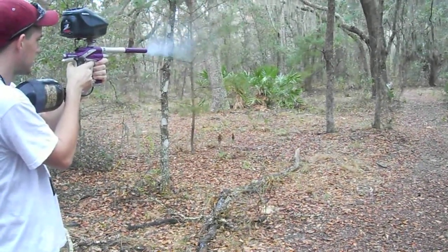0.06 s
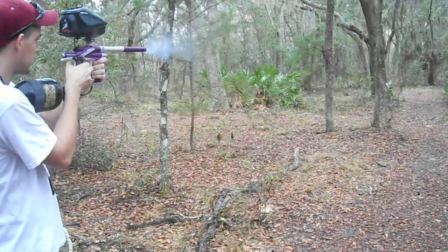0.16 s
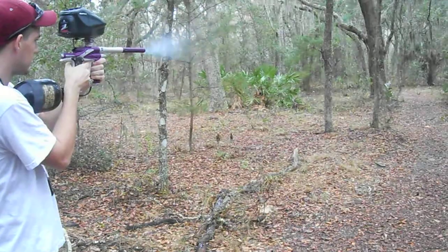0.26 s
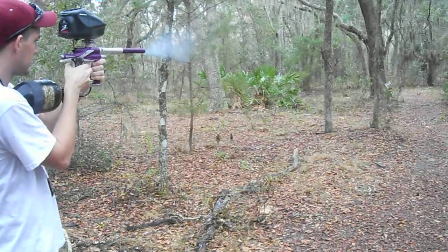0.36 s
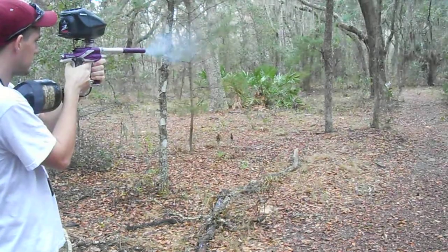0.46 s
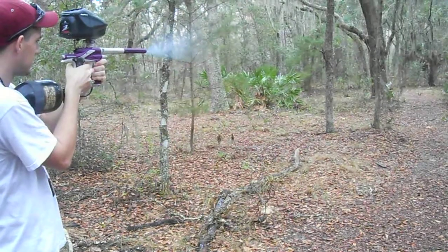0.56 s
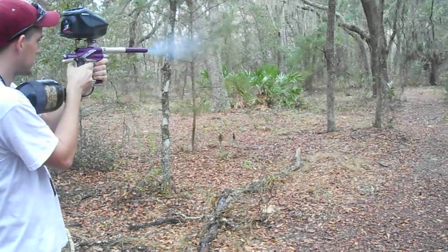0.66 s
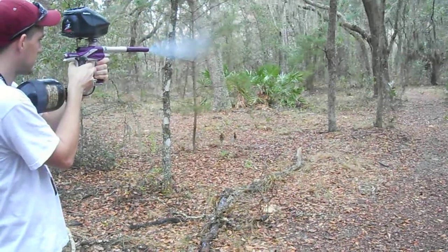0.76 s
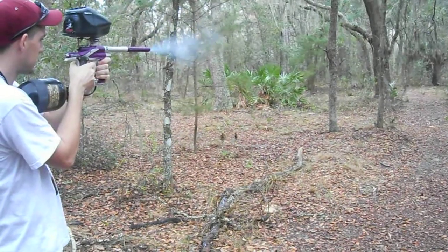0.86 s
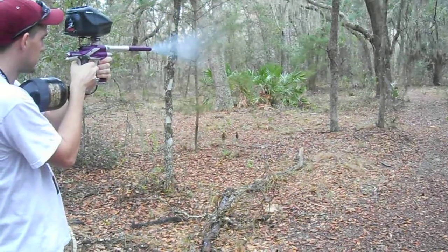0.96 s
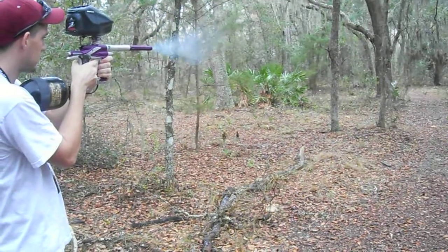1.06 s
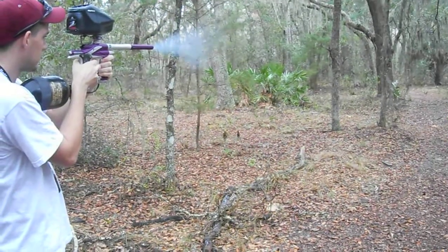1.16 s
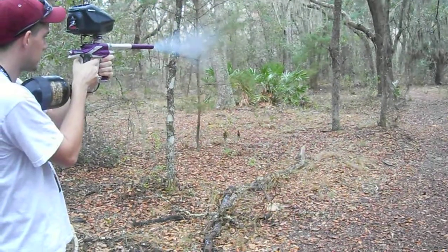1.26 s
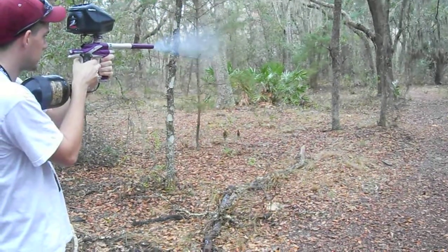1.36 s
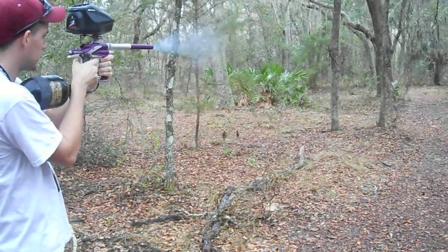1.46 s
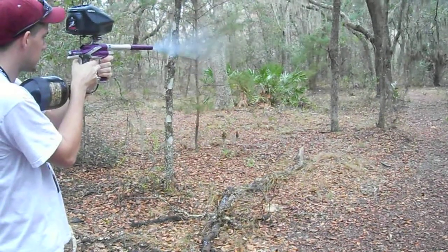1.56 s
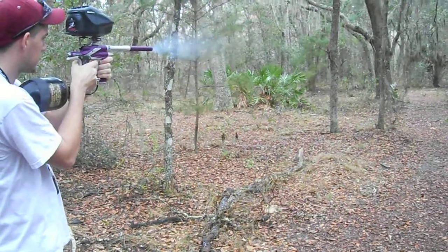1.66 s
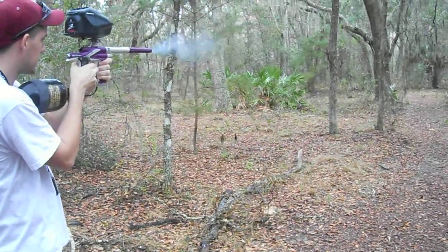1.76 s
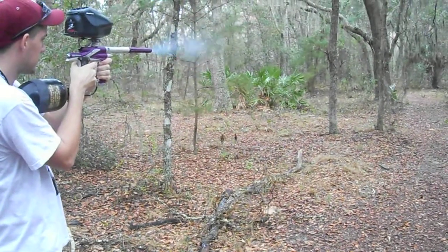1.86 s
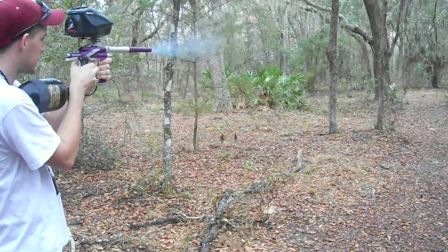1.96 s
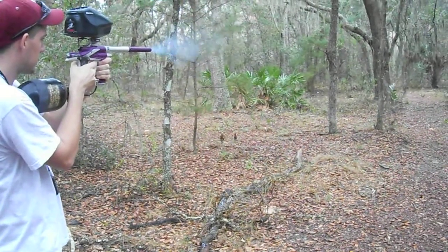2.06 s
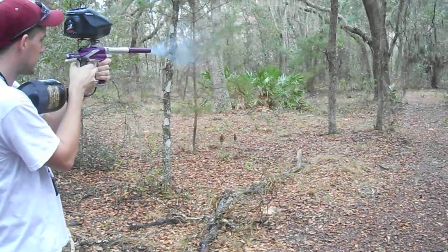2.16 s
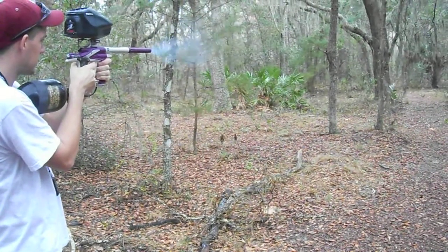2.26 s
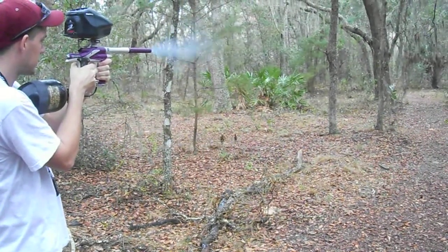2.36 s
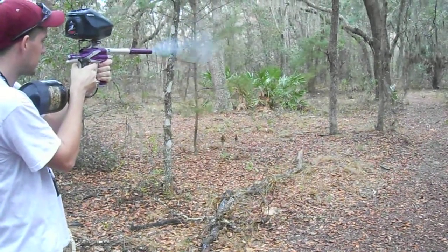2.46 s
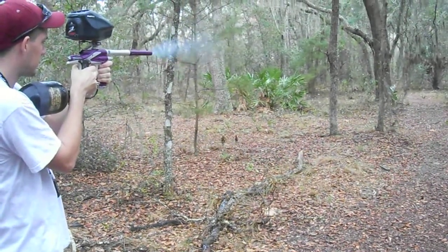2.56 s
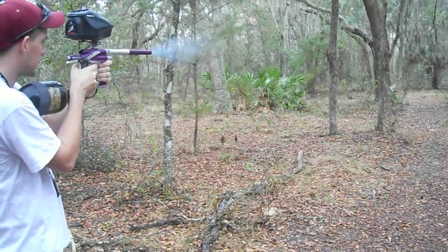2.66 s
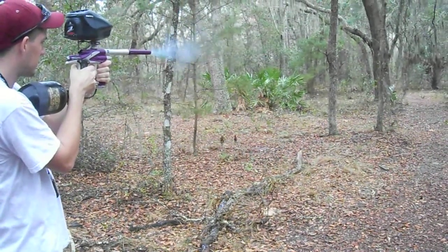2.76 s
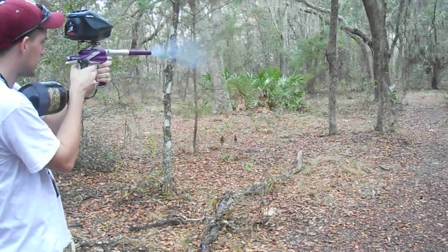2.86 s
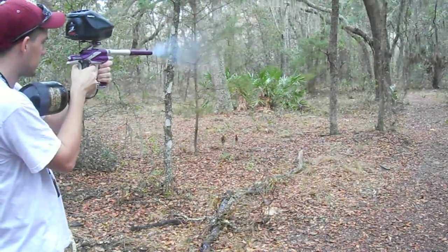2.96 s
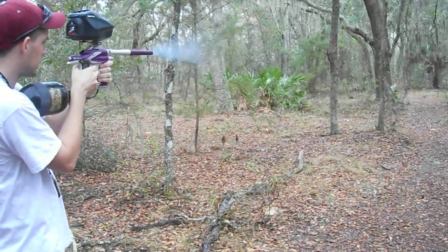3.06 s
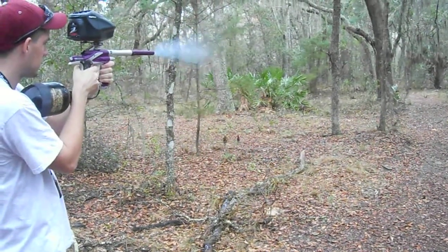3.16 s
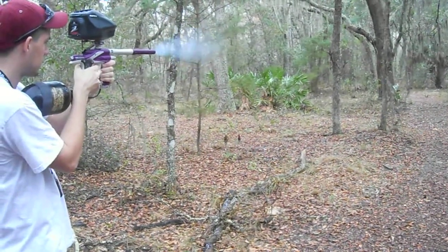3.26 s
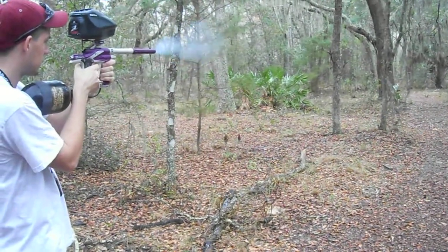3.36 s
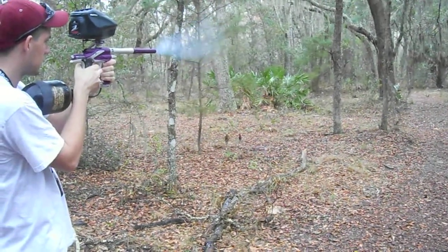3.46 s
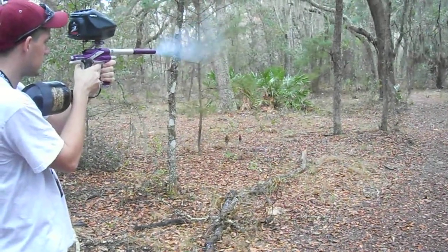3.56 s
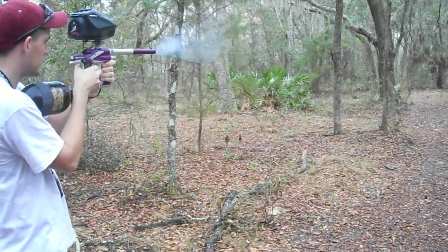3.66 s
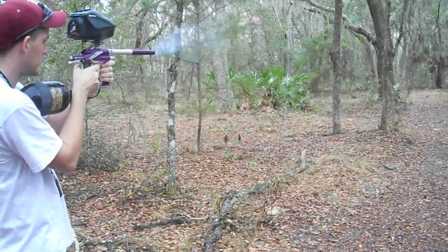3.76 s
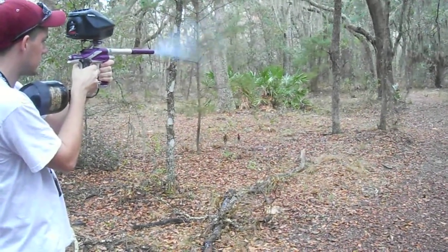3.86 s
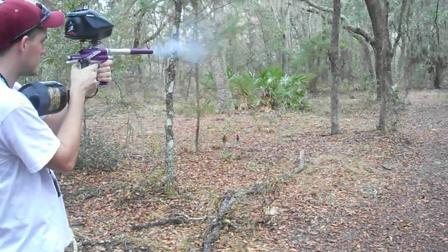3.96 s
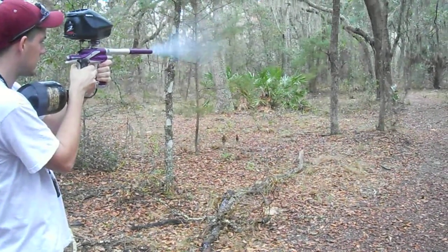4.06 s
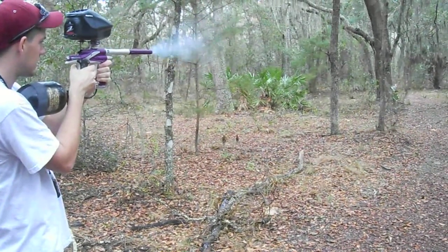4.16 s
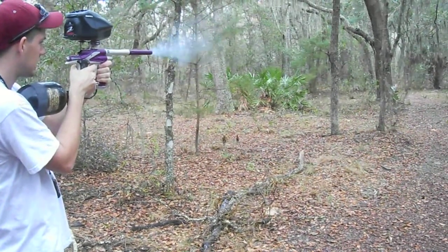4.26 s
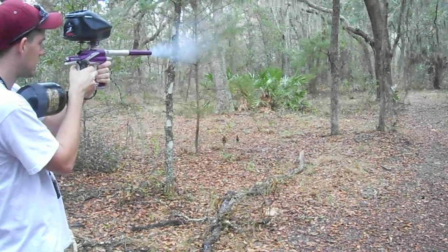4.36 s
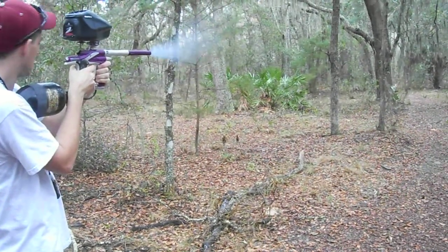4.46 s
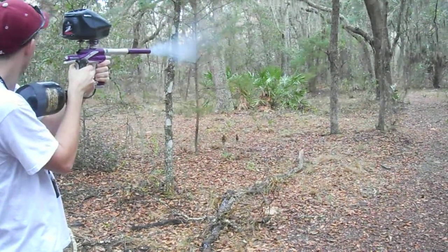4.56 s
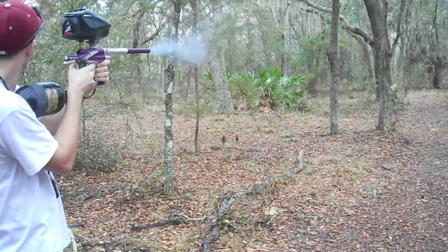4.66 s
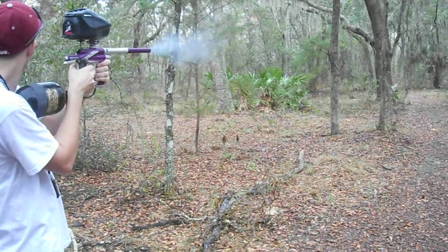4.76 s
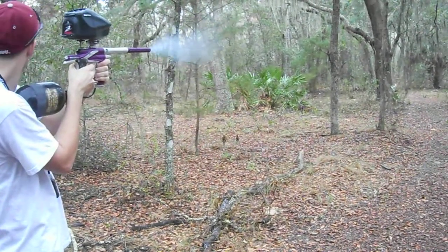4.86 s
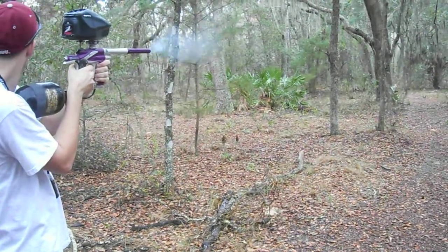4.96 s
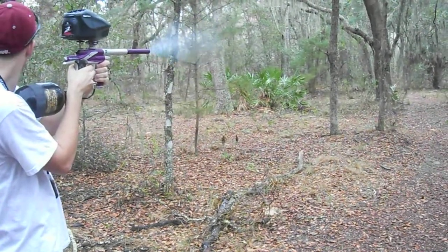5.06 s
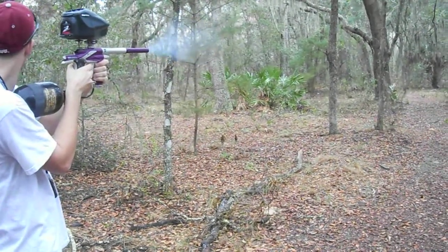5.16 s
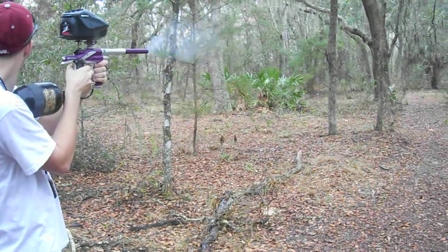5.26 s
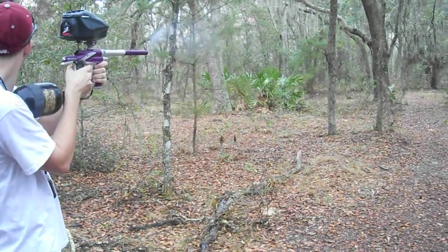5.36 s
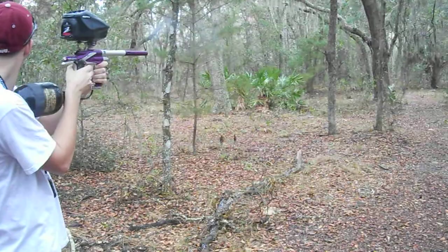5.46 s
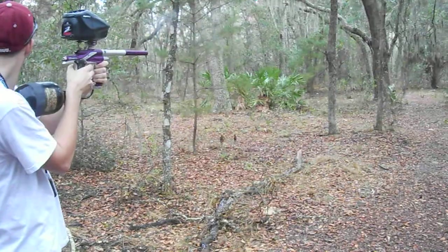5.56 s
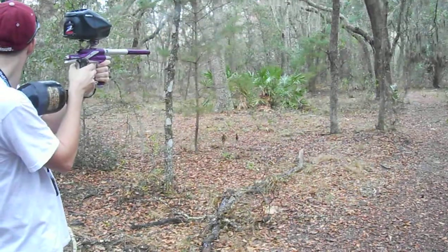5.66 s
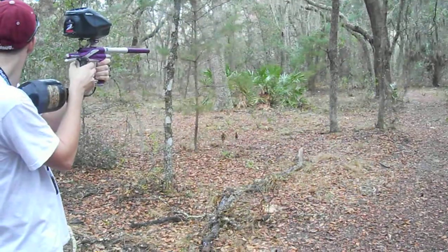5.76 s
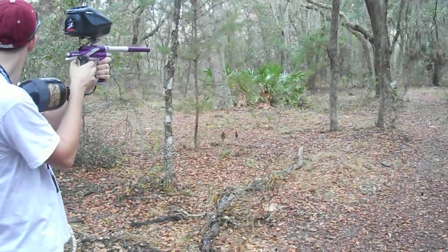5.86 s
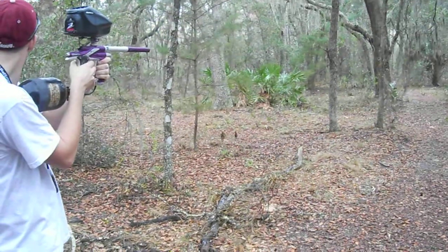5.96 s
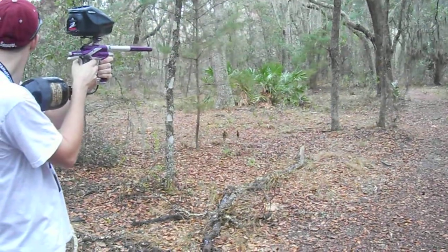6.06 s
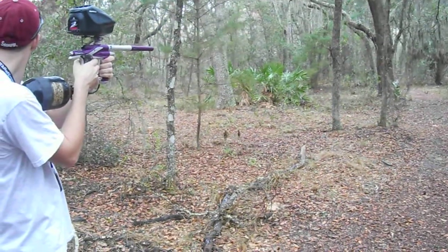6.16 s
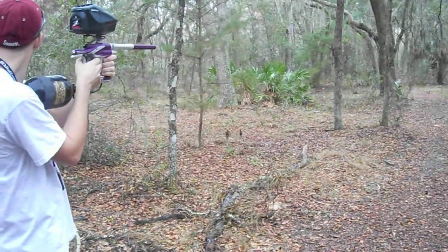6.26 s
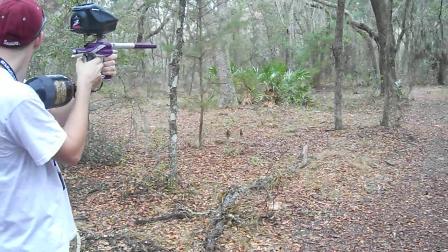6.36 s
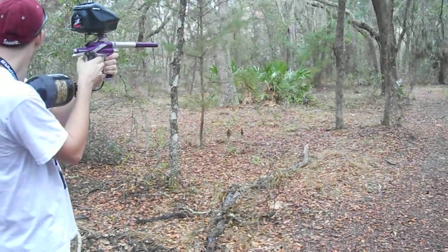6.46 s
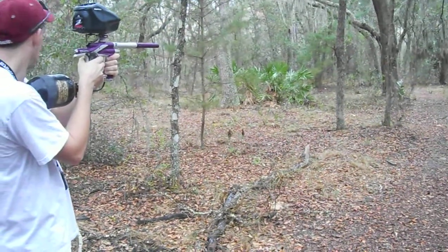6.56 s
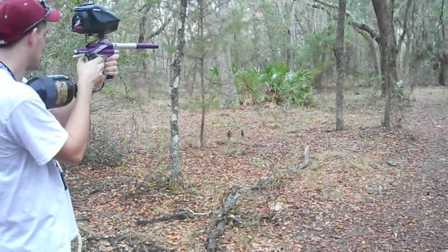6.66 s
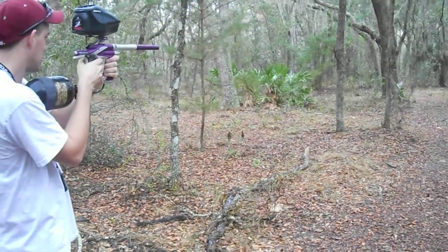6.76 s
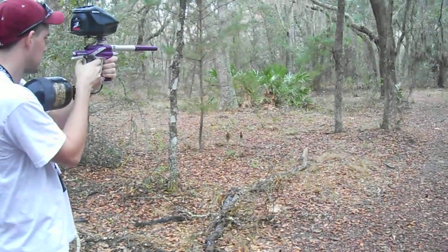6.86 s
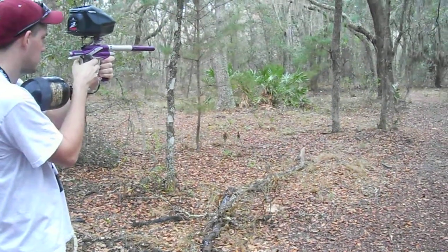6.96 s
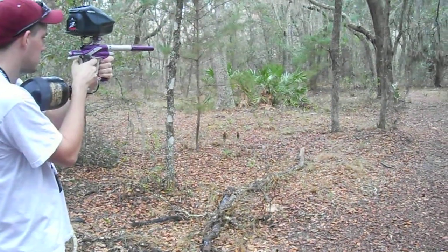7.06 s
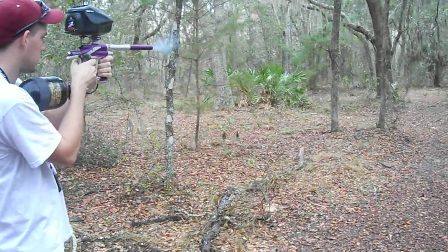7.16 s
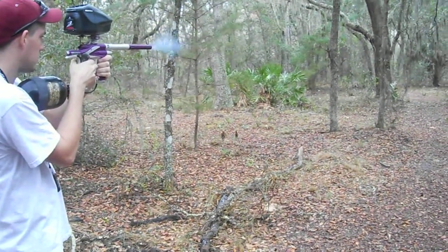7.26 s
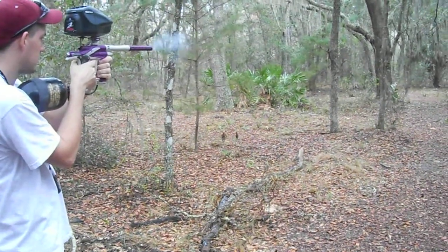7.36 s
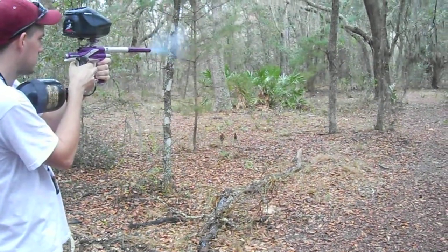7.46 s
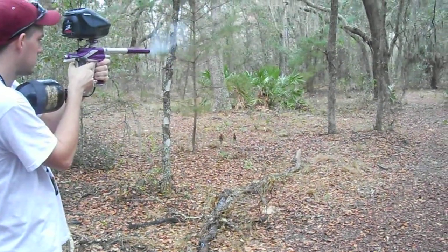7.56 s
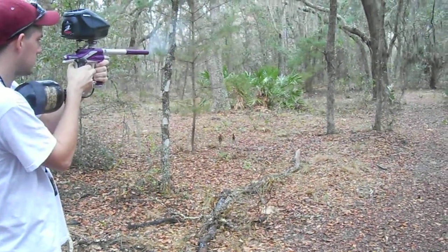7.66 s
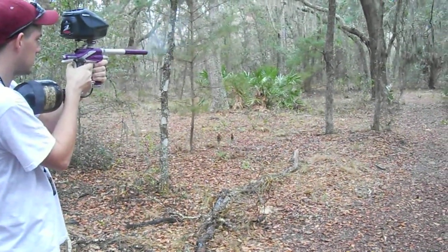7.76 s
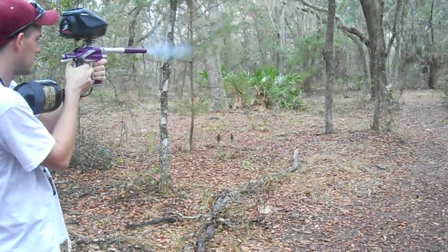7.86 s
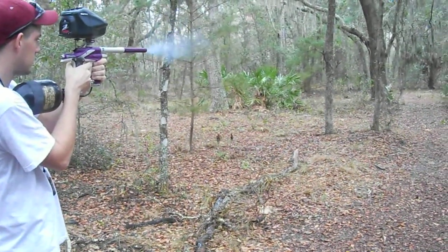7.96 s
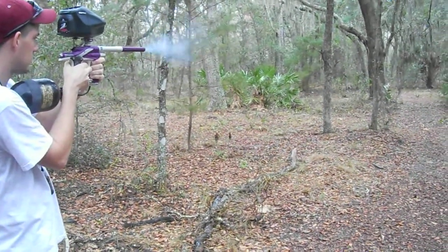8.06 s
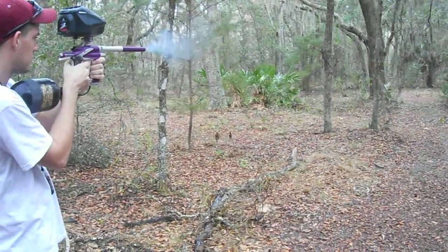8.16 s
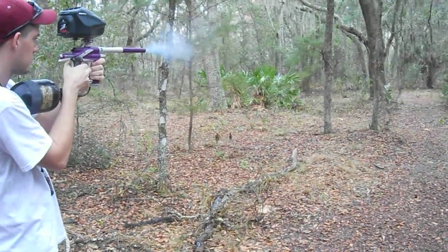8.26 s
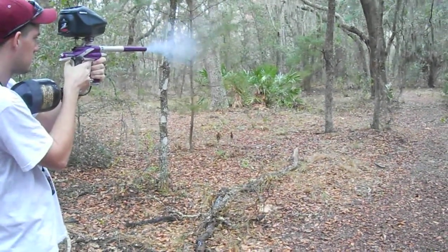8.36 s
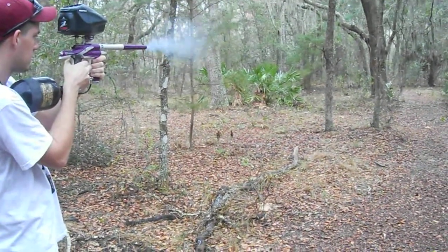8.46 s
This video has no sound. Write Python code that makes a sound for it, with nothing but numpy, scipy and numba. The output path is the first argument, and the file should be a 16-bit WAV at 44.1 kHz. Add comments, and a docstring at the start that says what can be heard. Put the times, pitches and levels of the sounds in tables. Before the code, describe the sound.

A compressed-air paintball gun fires close to the microphone at the edge of a wood, about twelve shots a second. Each shot is a hollow pop with a spit of gas, a click and a bolt clack, followed by a light echo from the trees. The firing runs from the start, with tiny breaks near 2.4, 3.7 and 4.9 seconds, and stops at about 5.2 seconds. Balls click against the plastic feeder in the gaps. Three faint, dull knocks on distant wood come between 5.6 and 6.2 seconds, while a soft outdoor hush slowly swells. At 7.1 seconds a loud, slightly overloaded shot breaks the lull, with two more single shots near 7.2 and 7.4 seconds. A last rapid string runs from 7.8 to about 8.5 seconds.

```python
"""Rapid strings of hollow pops, then a few single ones and a last string: a compressed-air paintball marker
close to the microphone, at the edge of a wood. Each shot is a sear click, a pop with jets of gas and the
clack of the returning bolt; the trees answer. Balls click in the feed neck and knock on wood far off.
The camera's gain control creeps up in the pause, lifting the outdoor hush, so the next shot overloads it."""
import sys
import numpy as np
from scipy import signal
from scipy.fft import rfft, irfft, next_fast_len
from scipy.io import wavfile
from scipy.ndimage import uniform_filter1d, minimum_filter1d
from numba import njit

SR = 44100
rng = np.random.default_rng(int(sys.argv[2]) if len(sys.argv) > 2 else 0)


def wav_record(signal):
    """Record a signal, one row per channel, as 16-bit PCM in the file named by sys.argv[1]."""
    frames = np.transpose(np.atleast_2d(signal))
    bounded = np.clip(frames, -1, 1)
    # unit amplitude maps onto the largest positive 16-bit level
    quanta = np.round(bounded * 32767).astype(np.int16)
    wavfile.write(sys.argv[1], SR, quanta)


N = 375732
LEAD = SR // 4  # samples of run-up before time zero
T = np.arange(SR // 10) / SR  # time within one small event [s]


def amp(db):
    """Decibels to gain."""
    return 10 ** (np.asarray(db) / 20)


def unit(x):
    """Scale to rms 1."""
    return x / np.sqrt(np.mean(x ** 2) + 1e-20)


def causal(points, size=4096):
    """The shortest causal impulse response through (frequency [Hz], level [dB]) points."""
    hz, db = np.transpose(points)
    spectrum_db = np.interp(np.log(np.fft.rfftfreq(size, 1 / SR) + 1), np.log(hz), db)
    cepstrum = irfft(np.log(amp(spectrum_db)))
    cepstrum[1:size // 2] *= 2
    cepstrum[size // 2 + 1:] = 0
    return irfft(np.exp(rfft(cepstrum)))


def through(x, response):
    """Convolve, keeping the length."""
    return signal.fftconvolve(x, response)[:len(x)]


def colour(x, points):
    """Shape the spectrum; white noise keeps its power."""
    response = causal(points)
    return through(x, response / np.linalg.norm(response))


def burst(t60):
    """A puff of noise that dies away."""
    return rng.standard_normal(len(T)) * amp(-60 * T / t60)


def ring(hz, t60):
    """One damped mode."""
    return np.sin(2 * np.pi * hz * T) * amp(-60 * T / t60)


def track(events):
    """Lay (time [s], level [dB], sound) events on the time line."""
    out = np.zeros(LEAD + N + SR)
    for s, db, sound in events:
        out[LEAD + round(s * SR):][:len(sound)] += amp(db) * sound
    return out[:LEAD + N]


# Trigger pulls beside the microphone: (first shot [s], last shot [s], usual bolt travel [s])
TRIGGER_PULLS = [(-.0399, 2.376, .0255), (2.5159, 3.6432, .0253), (3.7915, 4.8384, .0253),
                 (4.9843, 5.1451, .025), (7.0853, 7.0853, .0183), (7.2373, 7.2373, .0213),
                 (7.4368, 7.4368, .0213), (7.7618, 8.4862, .0224)]

def firing_times(cycle_s=.0805, head_start_s=.0028):
    """Times of shots and bolt returns; the rested bolt comes back sooner on a pull's first shot."""
    shots, returns = [], []
    for first, last, travel in TRIGGER_PULLS:
        string = np.linspace(first, last, round((last - first) / cycle_s) + 1)
        shots.extend(string)
        returns.extend(string + travel - head_start_s * (string == first))
    return np.array(shots), np.array(returns)


# The sear's click, close up: (frequency [Hz], relative level [dB])
SEAR_SPECTRUM = [(60, -6), (220, 1.5), (500, -9.5), (900, 11), (1600, -6.5), (3000, -9.5), (5500, -8.5),
                 (10000, -14)]

def sear(shots, db=-32.5, ahead_s=.0112):
    """The sear lets the hammer go just before each shot."""
    return colour(track((s - ahead_s, db, burst(t60=.044)) for s in shots), SEAR_SPECTRUM)


# Resonances of barrel and body, close up: (frequency [Hz], relative level [dB])
BARREL_MODES = [(92, -31), (148, -25), (250, -22.5), (348, -21.5), (440, -22), (578, -24.5), (708, -21),
                (815, -19.5), (918, -19), (1105, -27.5), (1208, -73), (1335, -28), (1440, -24), (1578, -21),
                (1812, -23), (1985, -29), (2405, -19), (2650, -41), (3410, -22), (3970, -22)]

def pop(flow_s=.012, quality=24, vary_db=1.42, detune=.0089, body_hz=1150):
    """The barrel sounds only while the gas flows, nearly alike on every shot; high modes fade first."""
    hz, db = np.transpose(BARREL_MODES)
    size, pitch = rng.standard_normal((2, len(hz)))
    # neighbouring air modes swing opposite ways and swell late; the body's start with the hammer
    signs = np.where(hz < body_hz, (-1) ** np.arange(len(hz)), 1)
    phase = 2 * np.pi * np.outer(hz * (1 + detune * pitch), T)
    modes = np.sin(phase) * np.exp(-phase / (2 * quality))
    flow = np.exp(-(T / flow_s) ** 2)
    return (signs * amp(db + vary_db * size)) @ modes * flow


# Jets at valve, breech and muzzle, then off the ground: (delay [s], level [dB], t60 [s])
GAS_JETS = [(.0002, -11, .014), (.0022, -22.5, 0.012), (.0047, -11.5, 0.012), (.0098, -17.5, 0.015)]
# Their hiss at the microphone: (frequency [Hz], relative level [dB])
GAS_SPECTRUM = [(80, -57), (220, -15), (380, 5), (530, -7.5), (950, 6.5), (1400, -1.5), (2000, -4),
                (2450, 0), (3000, -5.5), (3900, 0.5), (5500, -4.5), (7500, -1), (8900, 3), (10000, -2)]

def report(shots, pop_db=-.62, vary_db=.38, lag_s=.0006):
    """The pop and the turbulent jets that leave with it."""
    pops = track((s + lag_s, rng.normal(pop_db, vary_db), pop()) for s in shots)
    jets = track((s + delay, rng.normal(db, 1), burst(t60))
                 for s in shots for delay, db, t60 in GAS_JETS)
    return ground(pops) + colour(jets, GAS_SPECTRUM)


def ground(x, delay_s=.00542, echo_db=-15, dull_hz=1500):
    """Add the reflection off the leaf litter, which reaches the microphone later and duller."""
    dull = signal.lfilter(*signal.butter(1, dull_hz, fs=SR), x)
    return x + amp(echo_db) * np.pad(dull, (round(delay_s * SR), 0))[:len(x)]


def click(hz, grit_db=-9, snap_db=7, grit_t60=.012):
    """A ball's hard shell meets plastic: one sharp contact with a broad, dry ring."""
    contact = amp(grit_db) * burst(grit_t60)
    contact[0] += amp(snap_db)
    return colour(contact, [(300, -26), (1100, -14), (2700, -15),
                            (.84 * hz, -5), (hz, 2), (1.16 * hz, -8), (10000, -11)])


def rattle(shots, loudest_db=-18):
    """The next ball rattles in after each shot."""
    times = shots + rng.uniform(.009, .022, len(shots))
    return track((s, loudest_db - 20 * rng.random(), click(rng.uniform(3700, 5840))) for s in times)


# The bolt's clack, close up: (frequency [Hz], relative level [dB])
BOLT_SPECTRUM = [(150, -21.5), (600, -10), (950, -5.5), (1350, -21.5), (2400, -17), (3000, -28.5),
                 (5000, -17), (6000, -17), (7550, -6.5), (8500, -17.5), (9900, -13)]

def bolt(returns, slam_db=-14, bounce_db=-29, frame_db=-31):
    """The bolt slams home and bounces; the frame rings."""
    home = returns + rng.normal(0, .0006, len(returns))
    slam = track((s, rng.normal(slam_db, 1.3), burst(t60=.0095)) for s in home)
    frame = track((s - .003, rng.normal(frame_db, 1), ring(rng.normal(968, 46), t60=.054)) for s in home)
    bounce = track((s + rng.uniform(-.0034, .01), rng.normal(bounce_db, 4), burst(t60=.021))
                   for s in np.tile(home, 2))
    return colour(slam + bounce, BOLT_SPECTRUM) + frame


# The trees' echo, heard from the edge of the wood: (frequency [Hz], relative level [dB])
TREE_SPECTRUM = [(30, -22), (100, -5), (200, -13), (320, 7.5), (420, 1.5), (520, 13), (750, 1), (1100, 10),
                 (2400, 4.5), (3600, 7), (4200, 4), (6000, 4), (10000, 3)]

def woods(x, near_db=-17.5, near_t60=.092, far_db=-22.5, far_t60=.83, rise_s=.044, sections=44):
    """Nearby trunks scatter a quick, grainy answer, the deeper wood a faint long one; both are diffuse."""
    t = np.arange(SR) / SR
    rise = 1 - np.exp(-(t / rise_s) ** 2)
    near = amp(near_db) * unit(rise * amp(-60 * t / near_t60))
    far = amp(far_db) * unit(rise * amp(-60 * t / far_t60))
    fade = np.hypot(near, far) / np.sqrt(SR)
    out = np.zeros(len(x) + SR)
    for part in np.array_split(np.arange(len(x)), sections):
        echoes = unit(rng.standard_normal(SR) * amp(5.4 * rng.standard_normal(SR)))
        answer = signal.fftconvolve(x[part], fade * echoes)
        out[part[0]:][:len(answer)] += answer
    return colour(out[:len(x)], TREE_SPECTRUM)


# The open air all around the microphone: (frequency [Hz], relative level [dB])
HUSH_SPECTRUM = [(15, -5), (30, -4), (60, -2.5), (110, -1.5), (190, -14.5), (300, -11), (420, -10),
                 (600, -13.5), (760, -5), (980, -3), (1370, -10.5), (2400, -24), (5000, -27), (10000, -29)]

def hush(db=-55):
    """The steady outdoor background, like a distant road; only the gain control makes it swell."""
    return amp(db) * unit(colour(rng.standard_normal(LEAD + N), HUSH_SPECTRUM))


# Balls in the feed neck, close by: (time [s], relative level [dB], ring [Hz])
FEED_CLICKS = [(2.4724, -13.5, 4840), (2.55, -12, 4270), (2.635, -15, 7400), (3.7352, -14.5, 4300),
               (4.919, -20.5, 5240), (5.2477, -12.5, 4580), (5.3177, -15, 3800), (5.402, -16.5, 3540),
               (7.3478, -20, 4700), (7.49, -23, 3900), (7.69, -20, 3720)]

def feed(gain_db=1):
    """Balls settle against the plastic, mostly between trigger pulls, a couple while a string is firing."""
    return track((s, db + gain_db, click(hz)) for s, db, hz in FEED_CLICKS)


# Balls striking wood far from the microphone: (time [s], relative level [dB], ring [Hz])
FAR_HITS = [(5.6176, -45, 490), (6.0056, -47, 744), (6.1754, -43, 925)]

def splats(gain_db=2):
    """Dull, short knocks from among the trunks."""
    def knock(hz):
        wood = [(.3 * hz, -24), (.8 * hz, -4), (hz, 3), (1.5 * hz, -14), (2700, -19), (6000, -36)]
        return colour(burst(t60=.028), wood)
    return track((s, db + gain_db, knock(hz)) for s, db, hz in FAR_HITS)


def scene():
    """The marker close by, the wood around it."""
    shots, returns = firing_times()
    direct = report(shots) + sear(shots) + bolt(returns) + rattle(shots) + feed() + splats()
    return (direct + woods(direct) + hush())[None, LEAD:]


def saturate(x, top):
    """Overload rounds off the peaks that near the top."""
    return x / (1 + np.abs(x / top) ** 6) ** (1 / 6)


@njit
def ride_gain(wanted, rest, attack, hold, release):
    """Gain in dB: drops quickly under loud sound, waits, then creeps back to rest."""
    gain, now, quiet = np.empty(len(wanted)), 0., 0
    for i in range(len(wanted)):
        quiet = 0 if wanted[i] < now + 3 else quiet + 1
        if wanted[i] < now:
            now += (wanted[i] - now) / attack
        elif quiet > hold:
            now += (rest - now) / release
        gain[i] = now
    return gain


def gain_control(x, ceiling_db=-6.5, crest_db=6.66, rest_db=17, attack_s=.0051, hold_s=.27, release_s=.3):
    """Hold the peaks near the ceiling and lift the pauses."""
    rms = np.sqrt(np.abs(uniform_filter1d(x ** 2, size=256)))
    peaks_db = 20 * np.log10(rms + 1e-6) + crest_db
    wanted_db = minimum_filter1d(ceiling_db - peaks_db, size=256, origin=127)
    return x * amp(ride_gain(wanted_db, rest_db, attack_s * SR, hold_s * SR, release_s * SR))


# The microphone's response, dull on top: (frequency [Hz], gain [dB])
MICROPHONE_RESPONSE = [(9900, 4.5), (10900, -9.5), (12000, -18), (13000, -43), (16000, -49)]

def record(dry, capsule_top=.24, amplifier_top=.76, dull_hz=13500, top_hz=16400):
    """One microphone, driven hard at close range, then gain control, overload and band limit."""
    microphone = through(saturate(dry[0], capsule_top), causal(MICROPHONE_RESPONSE))
    amplified = saturate(gain_control(microphone), amplifier_top)
    size = next_fast_len(N + SR // 4)
    hz = np.fft.rfftfreq(size, 1 / SR)
    passband = (hz < top_hz) / (1 + (hz / dull_hz) ** 10)
    return irfft(rfft(amplified, size) * passband, size)[None, :N]


dry = scene()
out = record(dry)
wav_record(out)
```